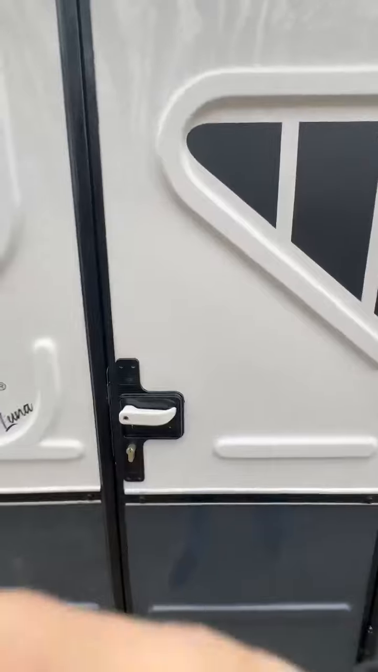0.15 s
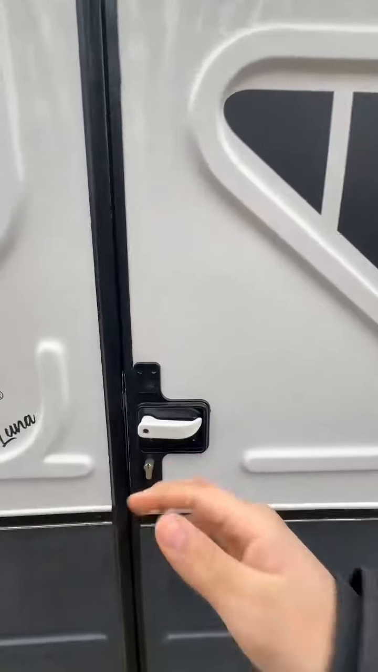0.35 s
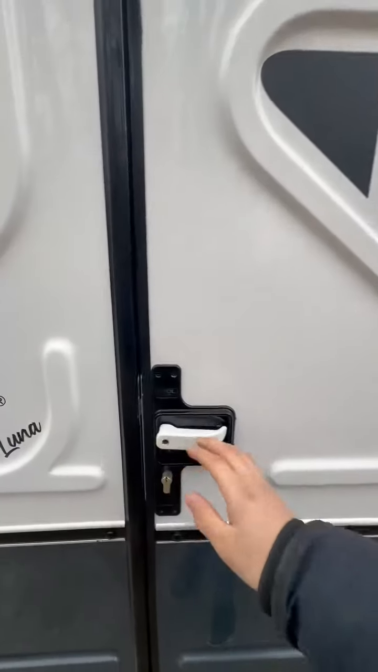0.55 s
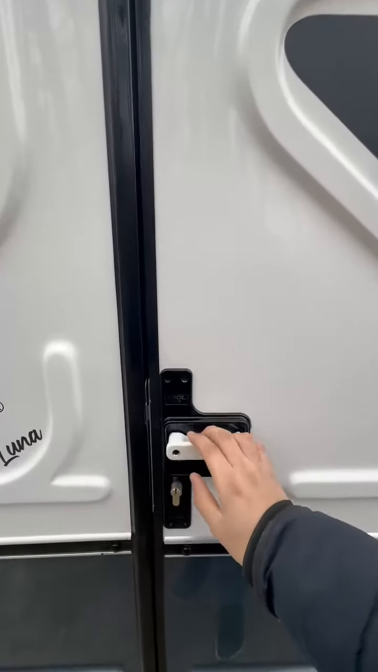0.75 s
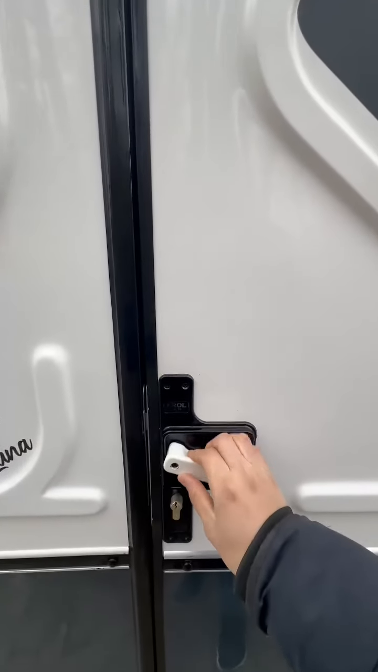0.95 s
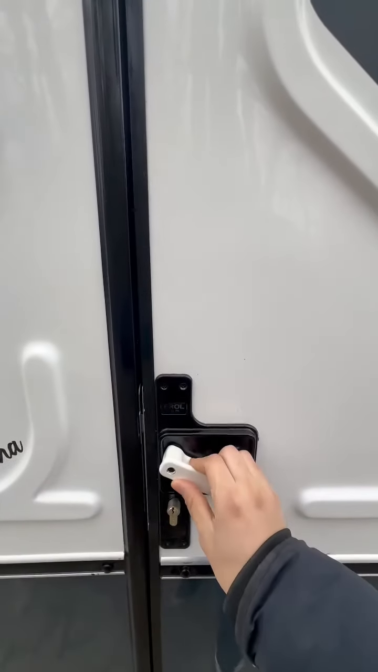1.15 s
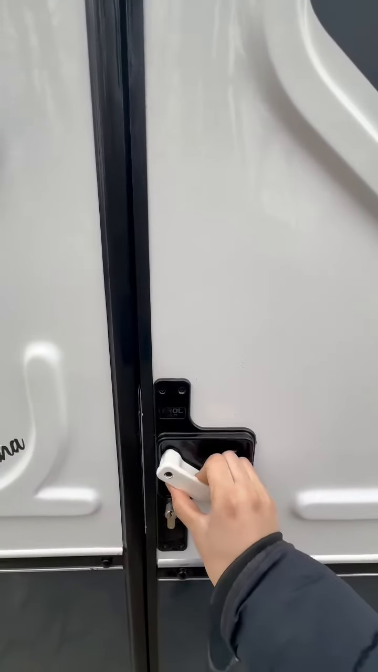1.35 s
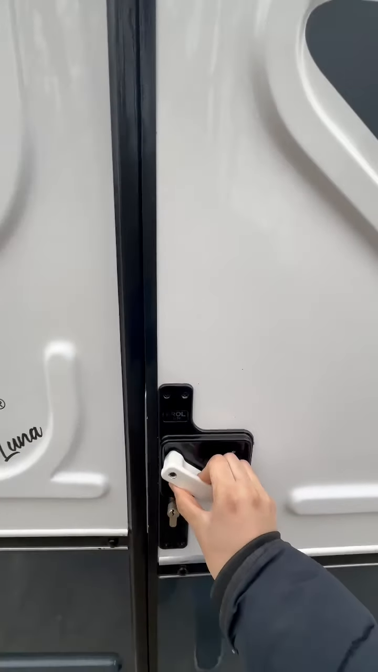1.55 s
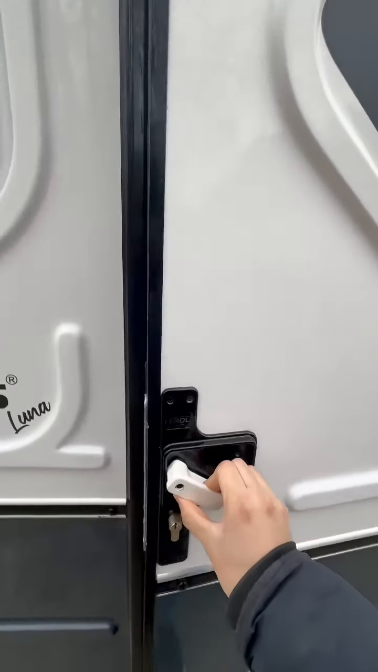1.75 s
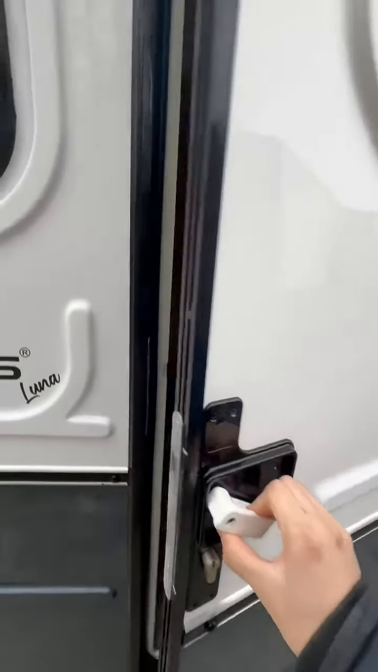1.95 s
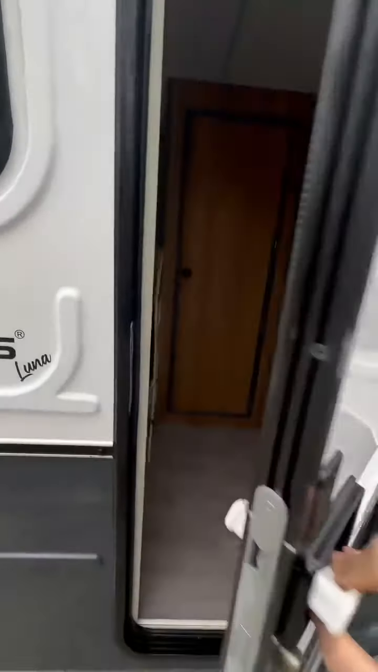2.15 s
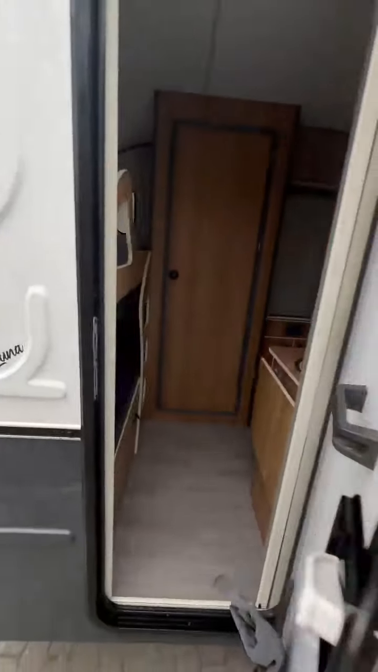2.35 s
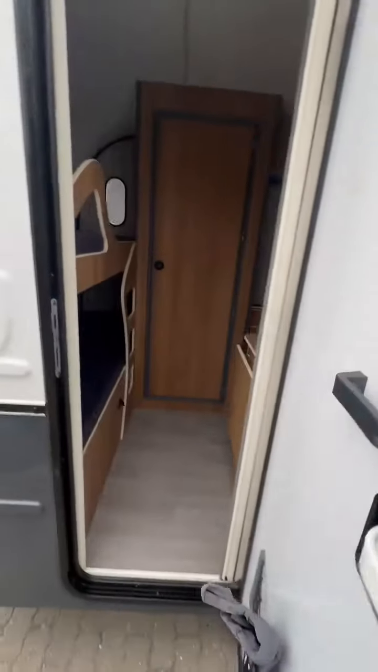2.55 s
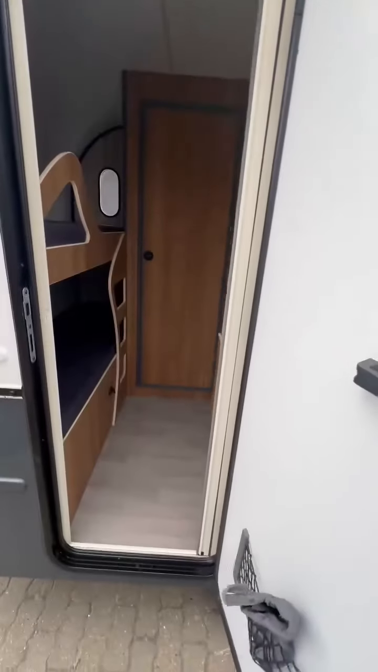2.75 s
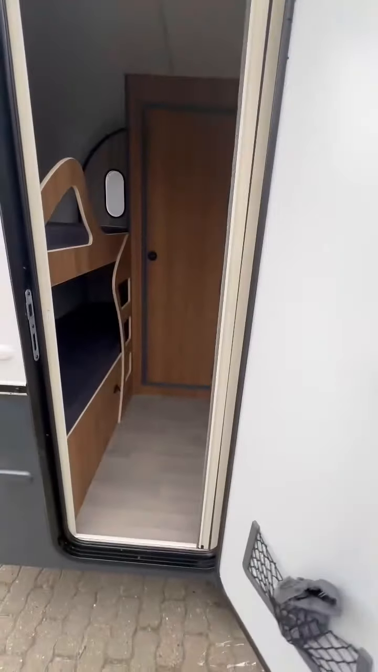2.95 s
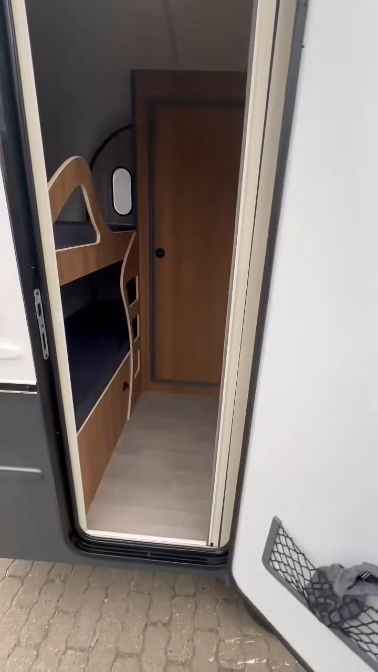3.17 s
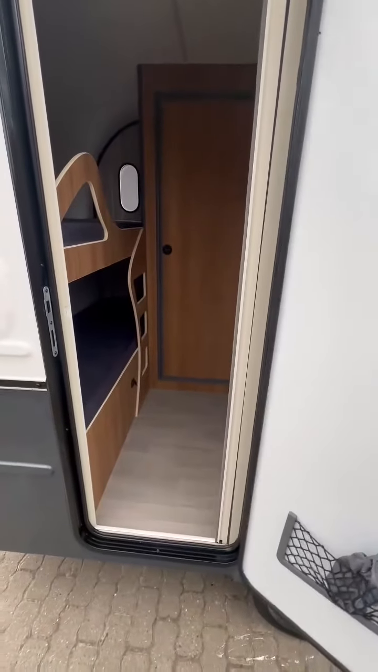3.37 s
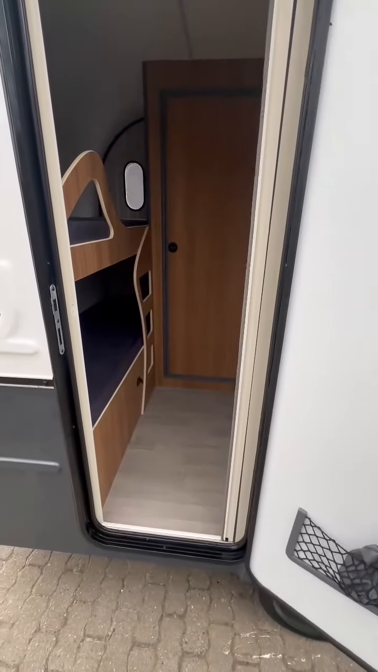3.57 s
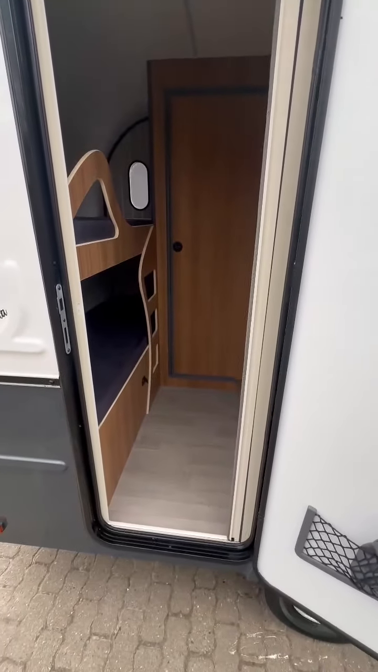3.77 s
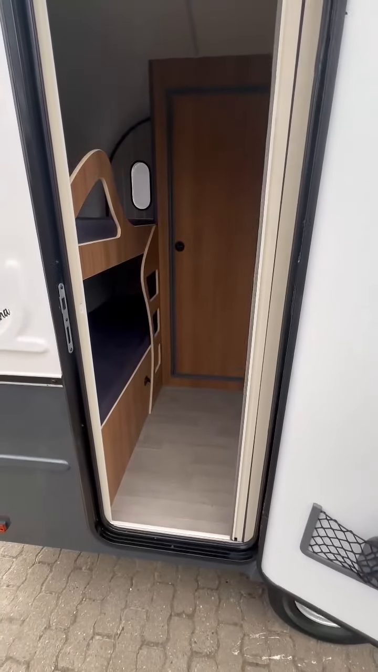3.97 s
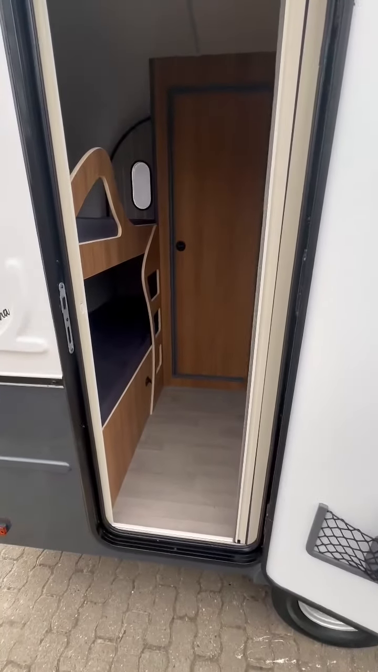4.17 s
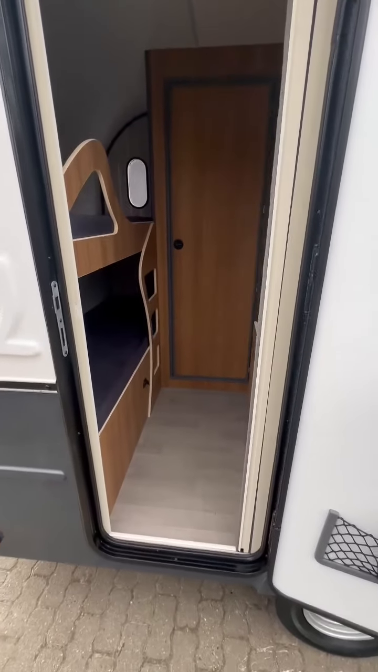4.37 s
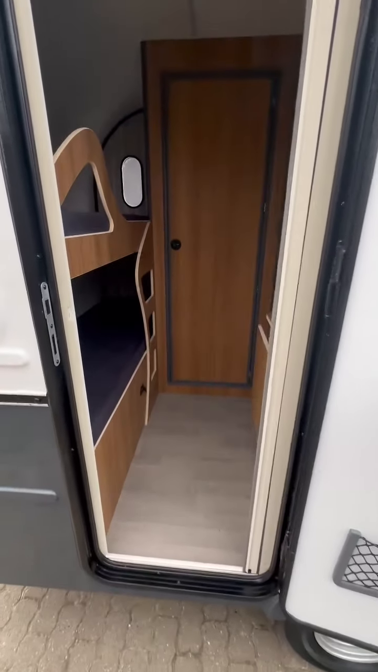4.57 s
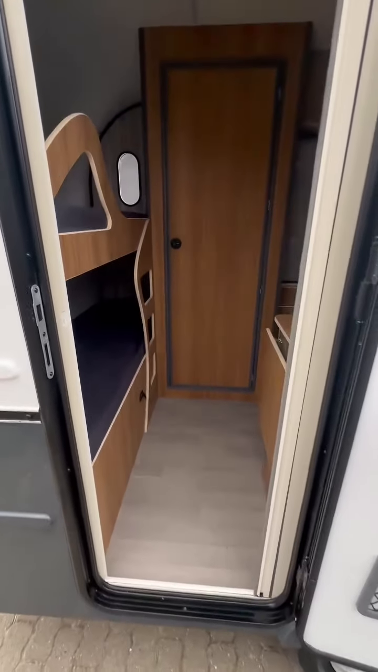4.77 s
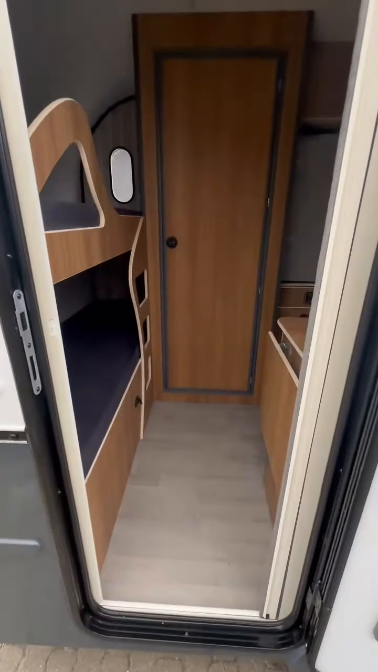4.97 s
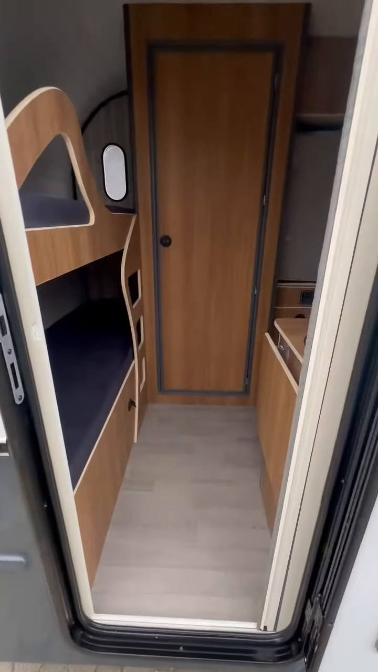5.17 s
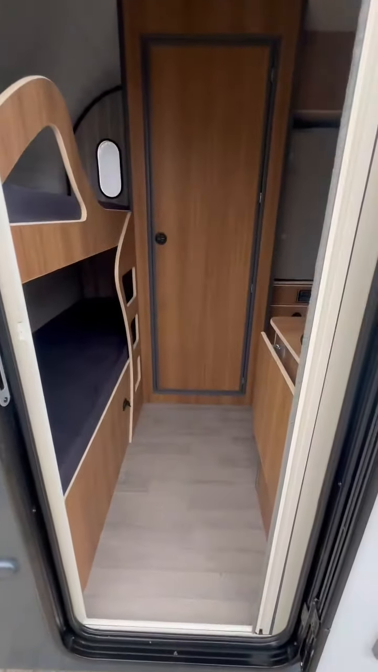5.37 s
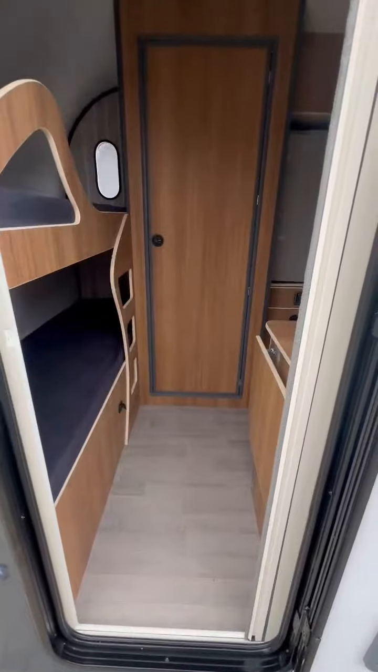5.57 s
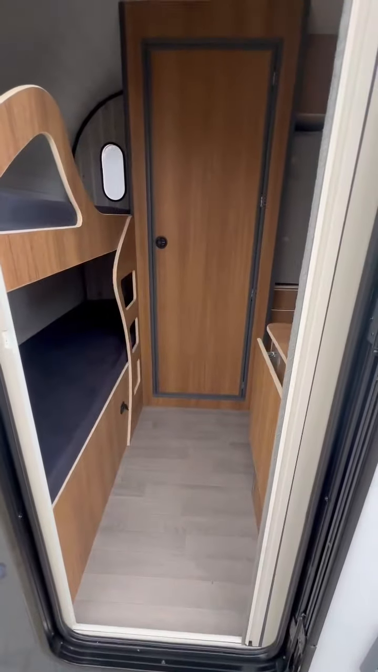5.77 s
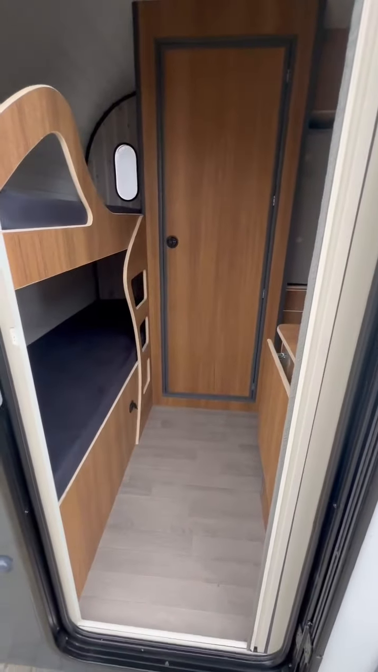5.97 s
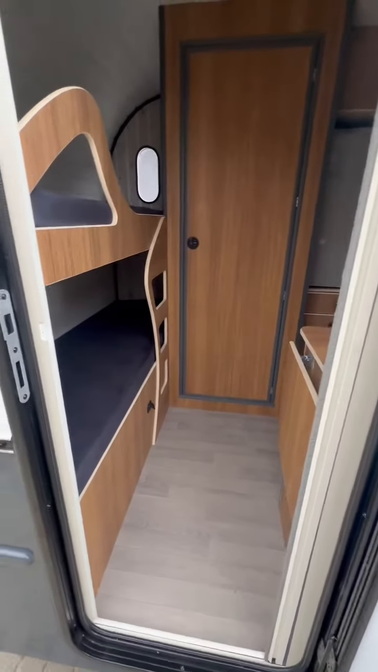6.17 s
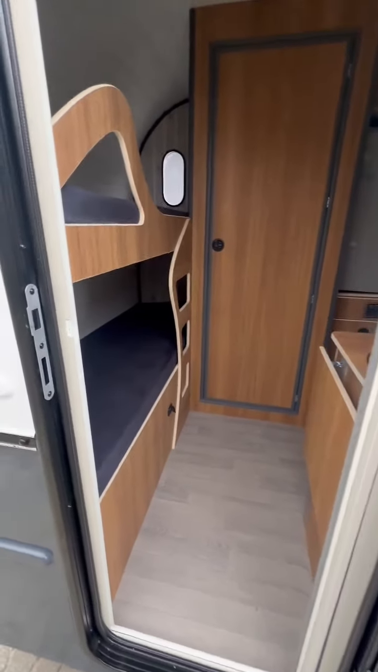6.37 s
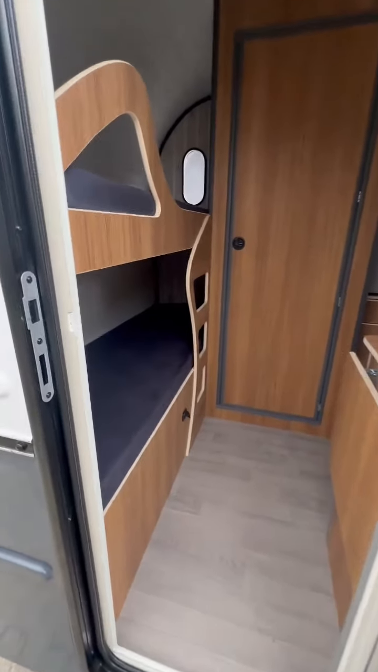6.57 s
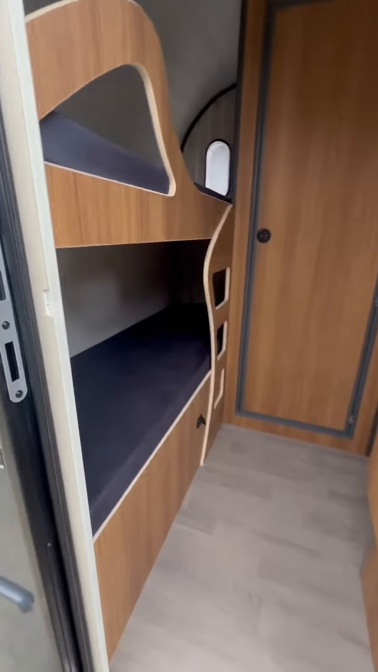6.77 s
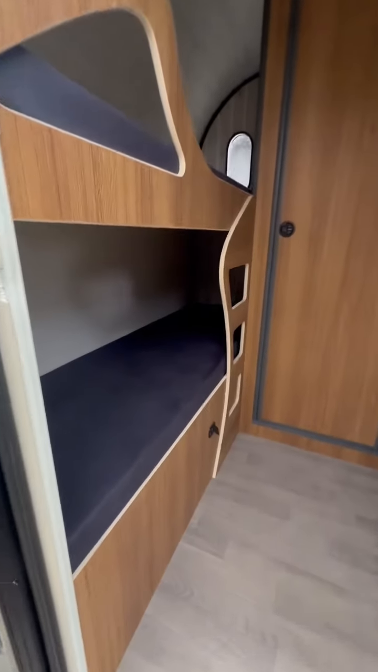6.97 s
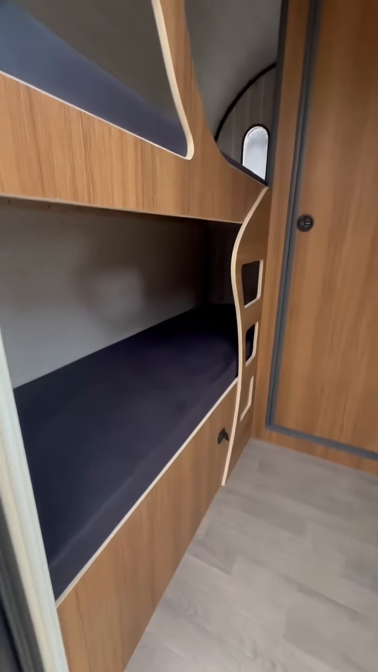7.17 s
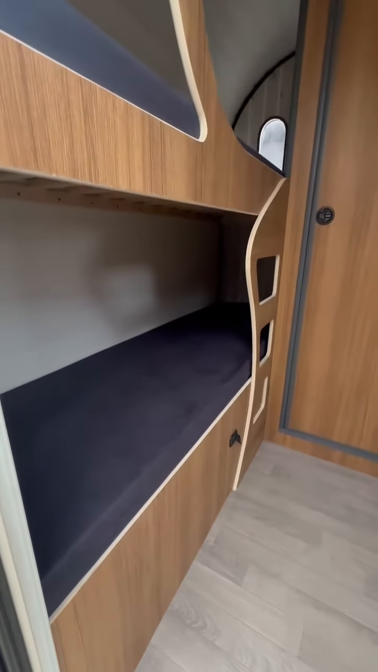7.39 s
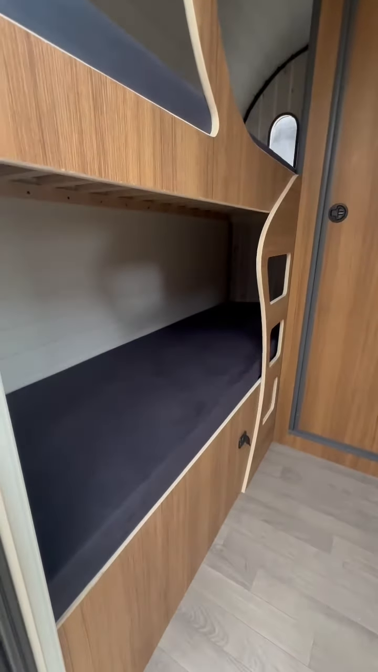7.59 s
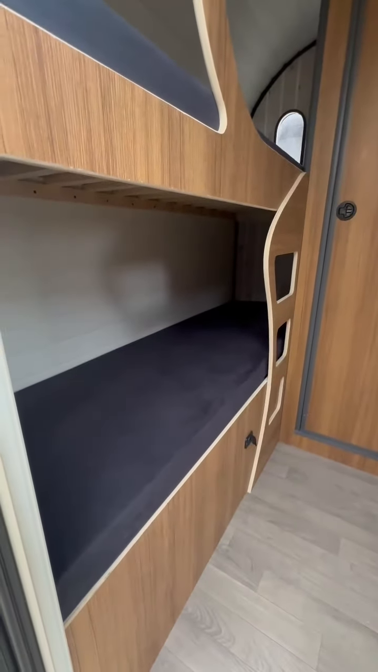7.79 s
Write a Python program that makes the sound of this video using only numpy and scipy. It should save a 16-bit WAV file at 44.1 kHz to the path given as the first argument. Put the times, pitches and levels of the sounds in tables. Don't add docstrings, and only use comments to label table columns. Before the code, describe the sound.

A caravan door's plastic handle knocks, its latch snaps hard, the hinge creaks, then the door hits its stop and rattles over outdoor wind rumble.

```python
import sys
import numpy as np
from scipy import signal
from scipy.fft import rfft, irfft, next_fast_len
from scipy.io import wavfile
from scipy.ndimage import uniform_filter1d, map_coordinates

SR = 44100
rng = np.random.default_rng(int(sys.argv[2]) if len(sys.argv) > 2 else 0)


def undo_db(level):
    steps = np.asarray(level, float) / 20
    return 10 ** steps


def generate_wav(signal):
    frames = np.transpose(np.atleast_2d(signal))
    scaled = np.clip(frames, -1, 1) * 32767
    pcm = np.round(scaled).astype(np.int16)
    wavfile.write(sys.argv[1], SR, pcm)


N = 345341

# f/Hz, level/dB
WIND_SPECTRUM = [(12, -84), (20, -48.5), (36, -3.5), (75, 3), (97, -1.5), (113, -6), (150, -4.5),
                 (178, -17.5), (226, -18.5), (259, -26), (300, -25), (390, -60), (660, -120)]
# f/Hz, level/dB
TRAFFIC_SPECTRUM = [(100, -36.5), (170, -2), (312, -5.5), (345, -1.5), (439, -7), (535, -3.5), (616, -7),
                    (865, -8), (1460, -16), (3000, -23), (3700, -26), (6500, -39), (11000, -120)]
# f/Hz, level/dB
CLOTH_SPECTRUM = [(1470, -46), (2500, -7), (3180, -13), (4860, -8), (5620, -5.5), (8060, -9), (9330, -11.5),
                  (9690, -12), (10100, -15), (11400, -11.5), (14800, -91.5), (22000, -120)]
# f/Hz, level/dB
EDDY_SPECTRUM = [(15, -60), (35, -6), (65, 2.5), (110, -6.5), (200, -17), (400, -28), (800, -48),
                 (1500, -120)]
# t/s, level/dB
GUSTS = [(0.0, -41.5), (0.41, -49), (0.74, -40.5), (1.16, -40), (1.42, -40), (2.14, -48.5), (2.55, -47.5),
         (2.92, -46), (3.58, -45.5), (3.75, -46), (4.23, -45.5), (4.64, -46), (4.93, -45.5), (5.17, -45.5),
         (6.56, -46), (6.96, -46), (7.26, -44.5), (7.83, -46.5)]
# t/s, level/dB
EDDIES = [(0, -48.5), (.45, -42), (.75, -48.5), (1.0, -60), (1.95, -63.5), (2.12, -40.5), (2.3, -58),
          (2.45, -46), (2.65, -40), (2.95, -55.5), (3.1, -61.5), (4.6, -61.5), (4.849, -55), (5.12, -40),
          (5.45, -59), (5.7, -60), (6.002, -53.5), (7.83, -54.5)]
# t/s, level/dB
SLEEVE = [(0.0, -68.5), (0.94, -75.5), (1.35, -77.5), (1.811, -73.5), (2.05, -63.5), (2.36, -66),
          (2.699, -71), (3.301, -79.5), (4.32, -80), (4.56, -71.5), (5.01, -82.5), (5.21, -63.5),
          (5.52, -73), (5.93, -68.5), (6.239, -76.5), (6.82, -67), (7.18, -70), (7.83, -80.5)]
PORTS_DB, SLEEVE_DB = 3, 3.5
TRAFFIC_DB, CARRIED = -52, 0.23

# f/Hz, correlation
ALIKE = [(30, 0.99), (60, 1), (130, 1), (270, 0.93), (560, 0.12), (1170, 0.36), (2470, 0.28), (5180, -0.33),
         (10900, -0.34)]
# f/Hz, phase/rad
LEAD = [(200, 0), (560, -1.5), (900, -.6), (1380, .4), (2410, -.9), (4050, 0), (5000, -1.9), (11000, -1.9)]
# f/Hz, level/dB
TILT = [(60, -13.5), (110, -10), (190, 7.5), (340, 17), (610, -6), (1080, -8), (1920, 0.5), (3430, -3.5),
        (6110, 3.5), (10900, -0.5)]
# f/Hz, t60/s
YARD = [(200, .2), (2000, .14), (5000, .08), (10000, .05)]
# f/Hz, t60/s
TREES = [(2000, .22), (3500, .3), (8000, .25)]
# f/Hz, level/dB
GATE = [(1000, -118), (2500, -106), (3400, -100), (4000, -96), (5000, -95.5), (5600, -103), (8000, -106),
        (9300, -103.5), (10000, -99), (11500, -92), (11900, 0)]
# f/Hz, level/dB
SIDE_GATE = [(86, -78), (258, -81), (430, -120), (1250, -120), (1500, -88.5), (2100, -88.5), (2400, -120)]

# t/s, level/dB
OPENING = [
    (3.511, -73),
    (3.639, -71),
    (3.769, -68.5),
]
# t/s, length/s, start f/Hz, end f/Hz
GLIDES = [(4.037, 0.07, 4900, 3250), (4.138, 0.065, 4350, 3350), (4.24, 0.055, 4000, 2900),
          (4.335, 0.055, 4100, 3150), (4.42, .07, 4400, 3300), (4.51, 0.055, 4900, 3000),
          (4.772, 0.035, 4120, 3050), (4.883, 0.05, 4200, 3450)]
# t/s, f/Hz, level/dB
HELD = [(3.7, 2400, -67), (3.754, 5280, -69), (3.87, 3740, -68), (3.9, 2340, -63), (3.958, 2700, -61),
        (4.187, 2370, -61), (4.25, 3200, -66), (4.26, 2720, -67), (4.53, 3250, -66), (4.56, 4800, -69),
        (4.635, 2430, -61), (4.72, 2430, -61), (4.89, 3500, -63), (4.91, 2420, -61), (4.96, 2420, -63)]
# t/s, length/s, start f/Hz, end f/Hz, level/dB
SLURS = [(3.886, .06, 4400, 5100, -67), (3.905, .07, 4700, 5500, -67), (3.93, .06, 5200, 6000, -68),
         (4.0, .08, 5600, 5200, -69), (3.43, .06, 5500, 5800, -73), (4.6, .05, 3900, 3000, -66),
         (4.68, .05, 3500, 2700, -65)]
OPENING_S, OPENING_HZ, OPENING_END_HZ = 0.06, 7640, 6760
GLIDE_DB, HELD_S = -62.5, .062
ANSWER_S, ANSWER_DB, ANSWER_PITCH = .022, -2, 1.06

# t/s, length/s, f/Hz, level/dB
HUMS = [
    (3.05, .85, 535, -62),
    (3.43, .35, 1350, -69),
    (2.1, .4, 1330, -69),
    (5.3, 1.8, 80, -46),
    (7.1, .72, 84, -45),
]
HUM_WIDTH_HZ = 8.4

# t/s, level/dB, crack level over it/dB, t60/s, ring f/Hz
GRIT = [(7.079, -35.5, -10.5, 0.024, 1500), (7.134, -36, -8, 0.016, 1610), (7.143, -39.5, -25, 0.041, 2270),
        (7.237, -34, -16, .02, 3370), (7.244, -24.5, -12, 0.027, 1900), (7.25, -37, -17, .025, 2500),
        (7.255, -32, -18, 0.027, 2240), (7.27, -25, -19, 0.041, 2450), (7.279, -45, -28, 0.033, 1790),
        (7.291, -37, -26, 0.032, 1990), (7.318, -52, -28, 0.024, 1900)]
# f/Hz, width/Hz, level/dB
STONE = [(1800, 500, 0), (2500, 500, -1), (4000, 500, -3)]
# t/s, length/s, scrape level/dB, hiss level/dB
SCUFFS = [(0.5, 0.079, -54.5, -52.5), (1.498, 0.13, -61, -54.5), (2.293, 0.038, -56.5, -78),
          (2.417, 0.048, -55, -49), (2.98, 0.092, -59, -60), (4.405, 0.091, -79, -56.5),
          (4.994, 0.059, -45.5, -65), (5.073, 0.14, -55.5, -53), (5.989, 0.085, -61, -57),
          (6.321, 0.21, -67, -57.5), (6.72, 0.19, -63, -57), (7.232, 0.11, -42.5, -46.5),
          (7.242, 0.063, -42.5, -56)]
# f/Hz, width/Hz, level/dB
SOLE = [(536, 93, 6), (1900, 116, 6.5), (2500, 210, 3), (3300, 220, -8.5), (3920, 110, -9.5)]

# f/Hz, level/dB, t60/s
SNAP_SKIN = [(43.9, -4.5, .02), (74.2, -19.5, .35), (81.5, -12.5, .35), (87.2, -17.5, .35),
             (122.3, -18, .29), (137.4, -4.5, .118), (188.9, -10, .058), (267, -22.5, .17),
             (285.5, -16, .1), (303, -20, .12), (428, -13, .07)]
# f/Hz, level/dB, t60/s
STOP_SKIN = [(89.3, -10.5, .02), (138.3, -24, .25), (192.6, -5.5, .028), (232.3, -4, .024),
             (282.2, -13, .062), (326.1, -5, .02), (379.5, -5, .02), (561.6, -16, .039),
             (761.5, -9.5, .035), (841.5, -17.5, .059)]
# t/s, f/Hz, level/dB, t60/s
REBOUND = (1.3165, 57, -8, .075)
# t/s, f/Hz, level/dB, t60/s
THUMPS = [(.536, 306, -21, 0.033), (0.58, 348, -31.5, 0.09), (.607, 720, -7.5, 0.0089),
          (0.6, 104, -21, 0.11), (0.66, 74.5, -9, 0.025), (0.88, 440, -13.5, 0.016),
          (0.88, 155, -20, 0.049), (1.306, 1085, -10, 0.03), (1.3014, 500, -14.5, 0.053),
          (1.536, 80, -23, 0.11), (1.632, 108, -28, 0.068), (2.698, 138.3, -34.5, 0.16),
          (2.7, 340, -31, 0.049), (2.821, 157, -32, 0.19), (3.02, 650, -40.5, 0.041),
          (3.021, 155, -30.5, 0.14), (4.685, 280, -26.5, 0.053), (4.818, 255, -27, 0.13),
          (5.274, 600, -36, 0.07), (5.256, 606, -36, 0.06), (5.085, 760, -32.5, 0.1),
          (.861, 1270, -25, .018), (2.534, 620, -31.5, 0.021), (2.991, 420, -44.5, 0.097)]
# t/s, level/dB, t60/s, top f/Hz
THUDS = [
    (.608, -28.5, 0.086, 503),
    (.864, -29.5, 0.083, 500),
    (1.307, -13.5, 0.076, 528),
    (4.686, -34.5, 0.22, 435),
    (4.822, -41, 0.15, 490),
    (5.075, -29, 0.21, 695),
    (5.165, -39, 0.36, 387),
    (5.261, -30.5, 0.13, 450),
]
SNAP_CREST_S, SNAP_LAST_S = 1.3171, 1.31
STOP_S, STOP_LAG_CYCLES = 5.0524, 3.065
PANEL_HZ, PANEL_DB, PANEL_T60 = 236.4, -3.5, 0.054

SWING = [(.971, -33, -5.5, 0.017, 2080), (0.977, -30, -11, 0.019, 890), (1.037, -36, -1, 0.036, 730),
         (2.322, -39, -23, 0.091, 720), (2.421, -39.5, -14, 0.037, 990), (2.434, -42.5, -18, 0.086, 1287),
         (2.533, -30, -6, 0.034, 995), (2.696, -39.5, -24.5, 0.02, 680), (2.85, -41, -25, 0.065, 885),
         (3.022, -44, -22.5, 0.025, 640), (4.441, -45, 1.5, 0.036, 1010), (6.323, -54.5, -9, 0.12, 730),
         (6.607, -46.5, -32, 0.032, 786), (6.79, -46, -14, 0.031, 1500)]
STOP = [(4.681, -31, -27.5, 0.031, 1500), (4.818, -49.5, -44, 0.034, 594), (4.968, -46.5, -31, 0.09, 1660),
        (4.998, -32.5, -19, 0.017, 1800), (5.053, -20.5, -17, 0.014, 1960),
        (5.0565, -9.5, -21.5, 0.019, 1105), (5.058, -15.5, -15, 0.015, 2580),
        (5.063, -25.5, -16, 0.024, 1950), (5.069, -26, -15, 0.015, 2950), (5.079, -37.5, -17, .1, 985),
        (5.093, -29.5, -4, 0.022, 1630), (5.137, -40, -11, 0.042, 1110), ]
RATTLE = [(5.162, -25, -27, 0.019, 1100), (5.168, -34, -27.5, 0.099, 697), (5.188, -30, -38, 0.037, 785),
          (5.254, -24.5, -37, 0.01, 1330), (5.273, -22, -29, 0.007, 1390), (5.279, -39.5, -33, 0.049, 656),
          (5.314, -29, -39, 0.016, 950), (5.39, -26.5, -22, 0.0079, 1140)]
HANDLE = [(0.5, -41, -15, 0.1, 982), (0.534, -39, -21, 0.027, 855), (0.559, -40.5, -14, 0.023, 907),
          (.512, -43, -4, .02, 5800), (.526, -37.5, -10, 0.03, 4800), (.529, -44, -20, .03, 3300),
          (.6025, -46, -3, 0.0083, 3000), (0.6048, -15, -13.5, 0.012, 761),
          (.6055, -12, -22.5, 0.0085, 1495), (.858, -39.5, -10.5, 0.028, 2500),
          (0.86, -27.5, -23, 0.015, 1900), (.861, -39, -15, 0.021, 5170), (0.902, -30, -21, 0.01, 1230),
          (1.204, -39, -13, 0.041, 769), (1.258, -38.5, -21, 0.084, 685), (1.386, -39, -15, 0.071, 628),
          (1.518, -45.5, -25, 0.049, 720), (1.598, -35, -16.5, 0.012, 600)]
LATCH = [(0.611, -25.5, -12, 0.016, 2980), (1.288, -40, -16, 0.027, 1000), (1.296, -36.5, -10.5, .03, 1500),
         (1.3015, -10, -36.5, 0.013, 1500), (1.302, -14, -35, 0.019, 800), (1.3052, -12, 0, 0.025, 1100),
         (1.3068, -3, -3.5, 0.0098, 2950), (1.3085, -13, -10, 0.015, 1900), (1.312, -24.5, -2, 0.027, 2167)]

FRAME = [(450, 350, -2), (950, 600, 0), (1400, 500, -1), (2050, 400, 0), (2850, 500, -12)]
CATCH = [(400, 300, 0), (800, 450, 1), (1450, 700, 0), (1950, 500, -4)]
HINGE = [(815, 86, -8), (1215, 24, -6), (1500, 270, -6.5), (2100, 490, -5.5), (2770, 31, -42)]
PLASTIC = [(1090, 500, 0), (1450, 500, -1), (2000, 500, -2), (2950, 500, -3)]
TONGUE = [(1085, 160, -1), (1550, 260, 1.5), (1860, 370, -1.5), (2224, 200, -1.5), (2950, 250, -3.5)]
BOLT = [(1100, 300, -10.5), (1900, 300, -2), (2680, 150, 0)]
# f/Hz, level/dB
CRACK = [(1290, -65.5), (2200, 0), (3170, 10), (3840, 1), (4220, 4.5), (6380, 2.5), (6880, 0),
         (10000, -1.5), (10700, -5.5), (11500, -34.5), (14800, -80.5), (22000, -120)]
# f/Hz, level/dB
TICK = [(1290, -34), (2200, -7), (4770, -6), (5460, 3), (6550, -2.5), (7150, -12.5), (10300, -11.5),
        (11000, -22), (14300, -65), (22000, -120)]
# t/s, length/s, scrape level/dB, hiss level/dB
SLIDES = [
    (1.16, 0.22, -56.5, -68),
    (1.2, 0.22, -63, -73),
    (1.286, 0.037, -43.5, -46.5),
    (1.32, 0.1, -54, -60),
]

# t/s, slip level/dB
PULL = [(1.688, -31), (1.741, -28), (1.785, -31.5), (1.81, -35.5), (1.865, -32), (1.92, -31), (1.98, -39),
        (2.02, -41)]
CREAK_S, FIRST_GAP_S, LAST_GAP_S, QUICKEN = 1.688, .053, .012, .7
SLIP_SCATTER_DB, SLIP_CRACK_DB, SLIP_T60 = -0.3, -22.5, 0.03
SLACK_HZ, PLATE_HZ, PLATE_SCATTER_HZ = 720, 820, 30


def unit(x):
    return x / np.sqrt(np.mean(x ** 2) + 1e-20)


def along(points, hz):
    f, v = np.transpose(points)
    return np.interp(np.log(hz + 1), np.log(f + 1), v)


def over_time(points):
    return np.interp(np.arange(N) / SR, *np.transpose(points))


def wobble(rate):
    knots = rng.standard_normal(int(N * rate / SR) + 4)
    return map_coordinates(knots, [np.arange(N) * rate / SR])


def filtered(x, response):
    m = next_fast_len(N + 8192)
    return irfft(rfft(x, m) * response(np.fft.rfftfreq(m, 1 / SR)), m)[..., :N]


def shaped(x, spectrum):
    return filtered(x, lambda hz: undo_db(along(spectrum, hz)))


def resonant(peaks, widen):
    def response(f):
        total = 0
        for k, (centre, width, db) in enumerate(peaks):
            damping = 1j * f * width * widen
            total = total + (-1) ** k * undo_db(db) * damping / (centre * centre - f * f + damping)
        return total
    return response


def rush(spectrum, patchy_db):
    z = signal.stft(rng.standard_normal((2, N)), nperseg=512)[2]
    field = uniform_filter1d(uniform_filter1d(rng.standard_normal(z.shape[1:]), 6, 0), 10, 1)
    pair = signal.istft(z * undo_db(patchy_db * unit(field)), nperseg=512)[1][:, :N]

    def spread(hz):
        turn = np.arccos(np.clip(along(ALIKE, hz), -1, 1)) / 2
        return undo_db(along(spectrum, hz)) * np.array([np.cos(turn), np.sin(turn)])
    mid, side = filtered(pair, spread)
    return np.array([mid + side, mid - side]) / np.sqrt(np.mean(mid ** 2))


def add(track, s, sound, pan_db):
    track[:, round(s * SR):][:, :len(sound)] += undo_db([[pan_db / 2], [-pan_db / 2]]) * sound


def walls(x, decays):
    hz, t, z = signal.stft(rng.standard_normal((2, SR // 2)), SR, nperseg=256)
    tail = signal.istft(z * undo_db(-60 * t / along(decays, hz)[:, None]), SR, nperseg=256)[1]
    return signal.fftconvolve(x, tail / np.linalg.norm(tail[0]), axes=1)[:, :N]


def contacts(events, body, crack, widen, db, ring_db, crack_db, quick, pan_db, blow_db=-40, give=2, rise_s=0.00043):
    jolts, cracks, rings = np.zeros((3, 2, N + SR))
    t = np.arange(SR // 5) / SR
    rise = 1 - np.exp(-t / rise_s)
    for s, peak_db, bright_db, t60, hz in events:
        rough, bright = rng.standard_normal((2, len(t)))
        dying = undo_db(peak_db - 60 * t / t60) * rise
        add(jolts, s, undo_db(db) * dying * rough, pan_db)
        add(jolts, s, undo_db(peak_db + blow_db) * np.ones(1), pan_db)
        add(rings, s, undo_db(ring_db) * dying * np.sin(2 * np.pi * hz * t), pan_db)
        snap = undo_db(peak_db + bright_db + crack_db - 60 * t / (quick * t60)) * rise
        add(cracks, s, snap * bright, pan_db)
    shaken = filtered(jolts[:, :N], lambda hz: resonant(body, widen)(hz) / (1 + 1j * hz / 2400) ** give)
    return rings[:, :N] + shaken + shaped(cracks[:, :N], crack)


def rubbing(strokes, body):
    low, high = np.zeros((2, 2, N + SR))
    for s, length, low_db, high_db in strokes:
        u = np.linspace(0, 1, round(length * SR))
        stroke = np.sin(np.pi * u ** .6) ** .9
        add(low, s, undo_db(low_db) * stroke, pan_db=0.0)
        add(high, s, undo_db(high_db) * stroke, pan_db=-3.5)
    grain = undo_db(2.0 * wobble(200)) * rng.standard_normal((2, N))
    scrape = unit(filtered(grain[0], resonant(body, 3.1)))

    def hiss_response(hz):
        dip = 1 - .7 * np.exp(-((hz - 5000) / 600) ** 2)
        return undo_db(along(CLOTH_SPECTRUM, hz)) / (1 + (hz / 9500) ** 8) * dip
    hiss = unit(filtered(grain[1], hiss_response))
    return low[:, :N] * scrape + high[:, :N] * hiss


def traffic():
    gust_db = over_time(GUSTS)
    level_db = TRAFFIC_DB + CARRIED * (gust_db - gust_db.mean()) + 0.95 * wobble(9.2)
    return undo_db(level_db) * rush(TRAFFIC_SPECTRUM, patchy_db=1.5)


def wind():
    level_db = over_time(GUSTS) + PORTS_DB + 0.35 * wobble(57) + 1.6 * wobble(5)
    rumble = undo_db(level_db) * rush(WIND_SPECTRUM, patchy_db=0.1)
    eddies = unit(shaped(rng.standard_normal(N), EDDY_SPECTRUM))
    eddies = eddies * undo_db(over_time(EDDIES) + 2.5 * wobble(12))
    return rumble + eddies * [[1], [-1]]


def bird():
    out, warble = np.zeros((2, N + SR)), wobble(160)
    song = [(s, OPENING_S, OPENING_HZ, OPENING_END_HZ, db) for s, db in OPENING]
    song += [(*note, GLIDE_DB) for note in GLIDES]
    song += [tuple(note) for note in SLURS]
    for s, length, a, b in GLIDES:
        song.append((s + ANSWER_S, length, ANSWER_PITCH * a, ANSWER_PITCH * b, GLIDE_DB + ANSWER_DB))
    song += [(s, HELD_S, hz, hz, db) for s, hz, db in HELD]
    for s, length, start_hz, end_hz, db in song:
        u = np.linspace(0, 1, round(length * SR))
        span_hz = end_hz - start_hz
        glide = span_hz * u ** (2.5 if start_hz > 6000 else .45)
        waver = (.12 * span_hz + 45) * warble[round(s * SR):][:len(u)]
        phase = 2 * np.pi * np.cumsum(start_hz + glide + waver) / SR
        add(out, s, undo_db(db) * np.sin(np.pi * u) ** 0.028 * np.sin(phase), 0)
    out = out[:, :N] * undo_db(2.5 * wobble(120))
    return undo_db(3) * out * [[1], [0]] + undo_db(2) * walls(out, TREES)


def sleeve():
    level_db = over_time(SLEEVE) + SLEEVE_DB + 0.95 * wobble(25) + 1.4 * wobble(6.8)
    return undo_db(level_db) * rush(CLOTH_SPECTRUM, patchy_db=4.0)


def shoes():
    crushed = contacts(GRIT, STONE, CRACK, widen=0.98, blow_db=16, db=4.5, ring_db=-16.5, crack_db=0.0,
                       quick=0.8, pan_db=-4.0, give=1.1)
    return crushed + rubbing(SCUFFS, SOLE)


def hums():
    out = np.zeros((2, N + SR))
    for s, length, hz, db in HUMS:
        hum = filtered(rng.standard_normal(N), resonant([(hz, HUM_WIDTH_HZ, 0)], 0.82))
        hum = unit(hum)[:round(length * SR)]
        add(out, s, undo_db(db) * np.sqrt(np.hanning(len(hum))) * hum, 0)
    return out[:, :N]


def thuds():
    out, t = np.zeros((2, N + SR)), np.arange(SR // 4) / SR
    for s, db, t60, top_hz in THUDS:
        band = signal.butter(2, [100, top_hz], "band", fs=SR, output="sos")
        dull = unit(signal.sosfilt(band, rng.standard_normal(len(t))))
        add(out, s, dull * undo_db(db - 60 * t / t60) * (1 - np.exp(-t / 0.00099)), .5)
    return out[:, :N]


def booms(slipping):
    out, t = np.zeros((2, N + SR)), np.arange(SR // 2) / SR
    blows = [(min(SNAP_CREST_S - 3 / 4 / mode[0], SNAP_LAST_S), *mode) for mode in SNAP_SKIN]
    blows += [(STOP_S + STOP_LAG_CYCLES / mode[0], *mode) for mode in STOP_SKIN]
    blows += [REBOUND, *THUMPS]
    blows += [(s, PANEL_HZ, db + PANEL_DB, PANEL_T60) for s, db, *_ in slipping]
    for s, hz, db, t60 in blows:
        swell = 1 - np.exp(-3.1 * hz * t)
        add(out, s, -undo_db(db - 60 * t / t60) * swell * np.sin(2 * np.pi * hz * t), .4)
    return out[:, :N]


def swing():
    return contacts(SWING, FRAME, TICK, widen=0.45, db=10.0, ring_db=-3.5, crack_db=15.5, quick=0.74, pan_db=-1.0)


def stop():
    knock = contacts(STOP, CATCH, CRACK, widen=1.4, db=13.0, ring_db=-4.0, crack_db=8.0, quick=0.81,
                     pan_db=-2.5, give=2.1)
    rattle = contacts(RATTLE, CATCH, CRACK, widen=1.27, db=1, ring_db=-11, crack_db=8.0, quick=0.73,
                      pan_db=-5.5, blow_db=22.5, give=3.3)
    return knock + rattle


def slips(count):
    slack = QUICKEN ** np.arange(count)
    gaps = LAST_GAP_S + (FIRST_GAP_S - LAST_GAP_S) * slack
    times = CREAK_S + np.cumsum(gaps) - gaps
    peaks_db = np.interp(times, *np.transpose(PULL)) + SLIP_SCATTER_DB * rng.standard_normal(count)
    ring_hz = PLATE_HZ + (SLACK_HZ - PLATE_HZ) * slack + PLATE_SCATTER_HZ * rng.standard_normal(count)
    return [(s, db, SLIP_CRACK_DB, SLIP_T60, hz) for s, db, hz in zip(times, peaks_db, ring_hz)]


def hinge(creak):
    ticks = contacts(creak[:6], FRAME, CRACK, widen=0.66, blow_db=19.5, db=5.5, ring_db=-9.5, crack_db=4.0,
                     quick=0.77, pan_db=-1.5)
    buzz = contacts(creak[6:], HINGE, CRACK, widen=2.5, db=11.5, ring_db=2.5, crack_db=16, quick=0.24,
                    pan_db=0.5, rise_s=0.002)
    return ticks + buzz


def handle():
    return contacts(HANDLE, PLASTIC, CRACK, widen=0.62, blow_db=15.5, db=11.0, ring_db=-1.5, crack_db=4.5,
                    quick=1.0, pan_db=-1.5)


def latch():
    snap = contacts(LATCH, TONGUE, CRACK, widen=1.5, blow_db=17, db=16, ring_db=-9.5, crack_db=3.0,
                    quick=0.94, pan_db=-0.5)
    return snap + rubbing(SLIDES, BOLT)


def scene():
    air = traffic() + wind() + sleeve()
    outdoors = undo_db([[.45], [-.45]]) * air + bird() + hums()
    creak = slips(count=16)
    near = shoes() + swing() + stop() + hinge(creak) + handle() + latch()
    low = booms(creak[3:]) + thuds()

    def to_ports(hz):
        half = undo_db(along(TILT, hz) / 2) * np.exp(.5j * along(LEAD, hz))
        return np.array([half, 1 / half])
    near_ports = filtered(near, to_ports)
    low = filtered(low, lambda hz: np.exp(.5j * along(LEAD, hz) * [[1], [-1]]))
    yard = walls(near + undo_db(-4.5) * low, YARD)
    return near_ports + low + undo_db(-14.5) * yard + outdoors


def drop_weak_bands(x):
    frames = dict(window="cosine", nperseg=2048, noverlap=1024)
    both = np.pad([x[0] + x[1], x[0] - x[1]], ((0, 0), (385, 0))) / 2
    hz, _, z = signal.stft(both, SR, **frames)
    band_hz = hz[4::8]
    bands = np.mean(abs(z[:, :1024].reshape(2, 128, 8, -1)) ** 2, axis=2)
    bands = np.maximum(bands / 2, uniform_filter1d(bands, 3))
    treble = np.median(bands[:, 20:52], axis=1, keepdims=True)
    loud_db = 10 * np.log10(treble + 1e-20) + 102
    whim_db = 3.2 * unit(uniform_filter1d(rng.standard_normal(bands.shape), 3))
    floor_db = np.maximum(along(GATE, band_hz), [-120 + 0 * band_hz, along(SIDE_GATE, band_hz)])
    limit_db = floor_db[..., None] + .55 * loud_db + whim_db
    z[:, :1024] *= np.repeat(bands > undo_db(2 * limit_db), 8, axis=1)
    mid, side = signal.istft(z, SR, **frames)[1][:, 385:][:, :N]
    return np.array([mid + side, mid - side])


def roll_off(x):
    return signal.sosfilt(signal.butter(12, 11500, fs=SR, output="sos"), x)


def record(dry):
    bass_cut = filtered(dry, lambda hz: 1 / np.sqrt(1 + (35 / (hz + 1)) ** 8))
    rounded = bass_cut / (1 + abs(bass_cut / .9) ** 6) ** (1 / 6)
    return roll_off(drop_weak_bands(rounded))


dry = scene()
out = record(dry)
generate_wav(out)
```